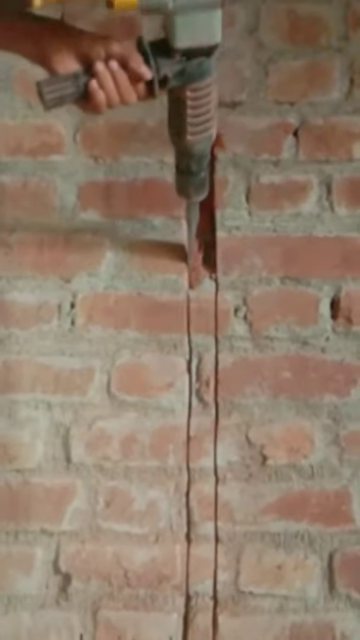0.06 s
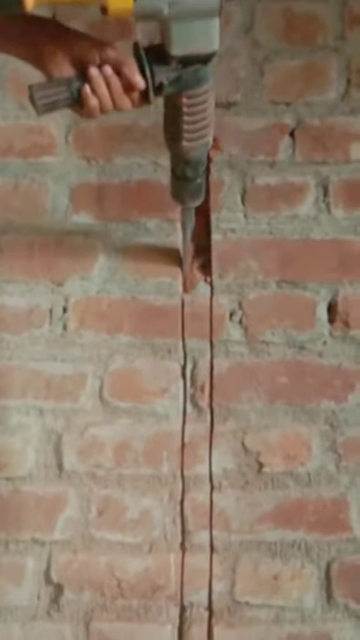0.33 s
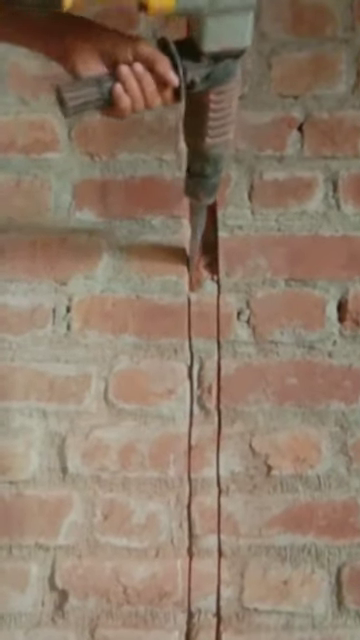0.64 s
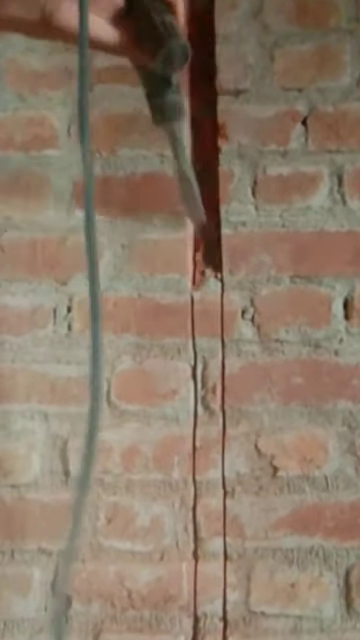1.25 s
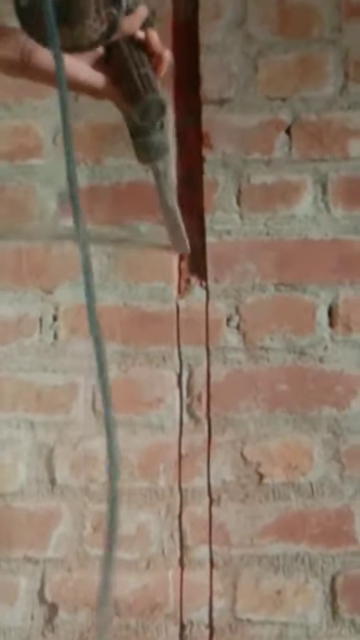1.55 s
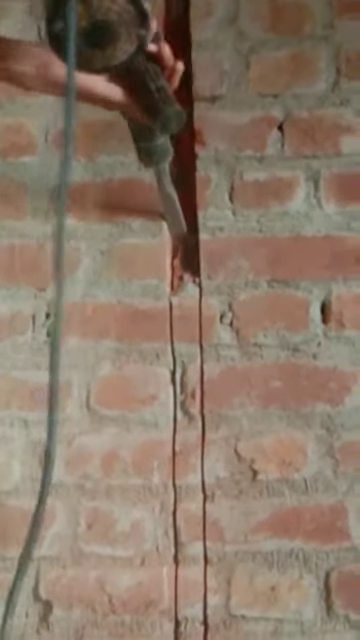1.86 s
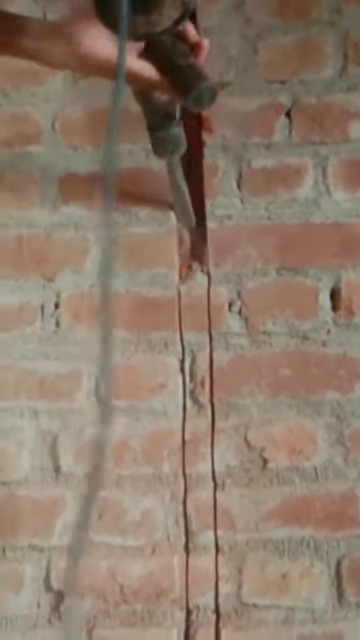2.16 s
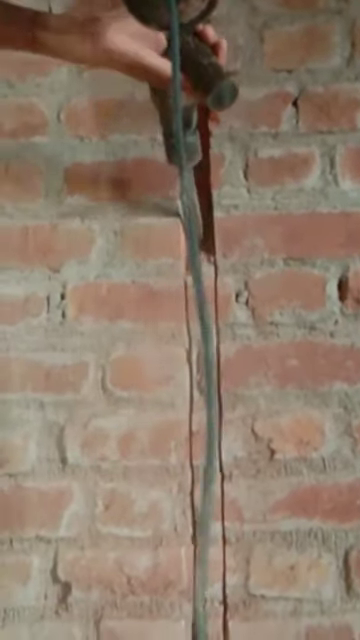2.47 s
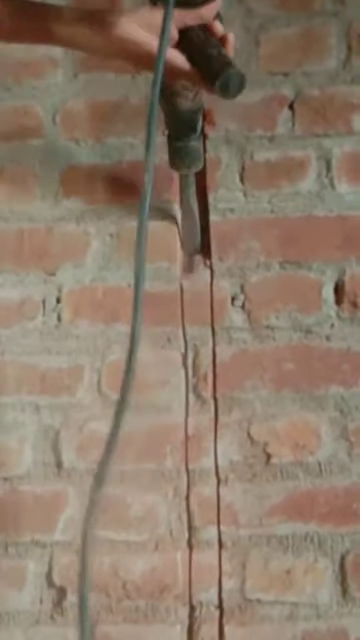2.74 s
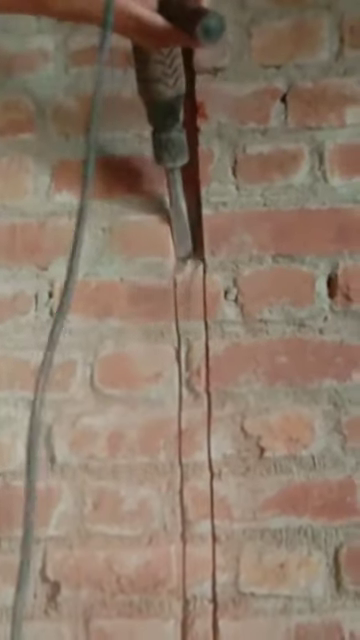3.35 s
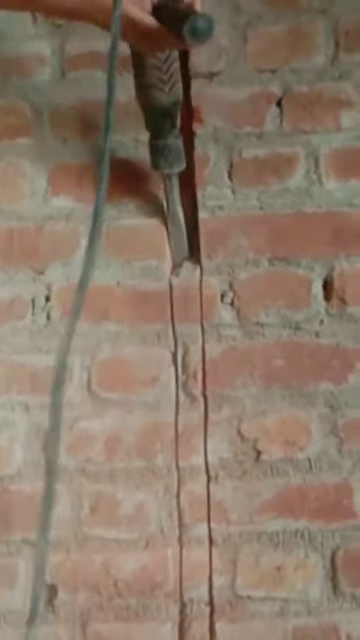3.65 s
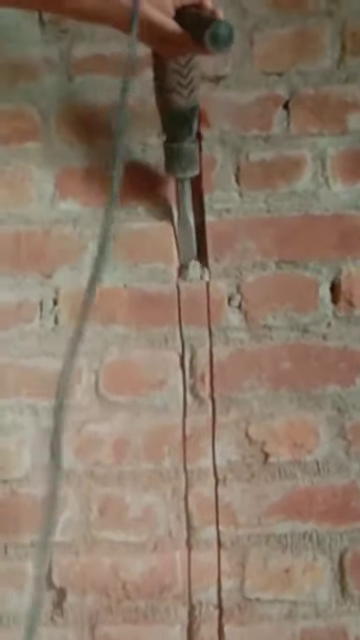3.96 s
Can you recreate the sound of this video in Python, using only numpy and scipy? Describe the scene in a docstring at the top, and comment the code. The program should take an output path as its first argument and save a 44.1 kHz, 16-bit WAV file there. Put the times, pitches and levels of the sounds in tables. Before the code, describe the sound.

An electric chipping hammer chisels a brick wall, winds down briefly, then hammers again.

```python
"""An electric chipping hammer cuts a channel in a brick wall, in a bare room.
At first about 53 blows a second crack the brick and ring the steel chisel, over the rush and whine
of the motor and a low hum. Before a second has passed the tool is lifted; it coasts down while the
chisel rattles loose in its holder. At two seconds it winds up and bites again, and the steel,
now wedged in the slot, sings thinly."""
import sys
import numpy as np
from scipy import signal
from scipy.fft import rfft, irfft
from scipy.io import wavfile
from scipy.ndimage import uniform_filter1d

SR = 44100
rng = np.random.default_rng(int(sys.argv[2]) if len(sys.argv) > 2 else 0)


def generate_wav(sig):
    """Save sig (samples, or channels by samples) to the path in sys.argv[1] as 16-bit PCM at SR."""
    pcm = np.round(np.clip(np.atleast_2d(sig).T, -1, 1) * 32767).astype(np.int16)
    wavfile.write(sys.argv[1], SR, pcm)


N = 176400

# Motor speed. Each row: time in seconds, piston strokes per second.
STROKE_RATE = [(0, 52), (.3, 55.3), (.48, 56), (.58, 52.4), (.65, 50), (.76, 51.1), (.87, 46.9),
               (1.14, 36.5), (1.46, 27.3), (1.7, 20.5), (2.0, 16), (2.09, 22.8), (2.135, 31.7), (2.2, 37.6),
               (2.35, 42.5), (2.5, 50.4), (2.65, 52.4), (2.8, 54), (3.15, 54), (3.35, 55), (3.65, 53),
               (4, 52.8)]
# Spells of hammering. Each row: start, end and the moment of one bite, all in seconds.
SPELLS = [(0, 1.0, .5605), (2.06, 4.02, 2.1206)]
# Force on the wall in each spell. Each row: time in seconds, relative level in dB.
FIRST_FORCE = [(0, -36), (.05, -28.5), (.27, -29.5), (.5, -29.5), (.66, -30), (.69, -38), (.78, -49.5)]
SECOND_FORCE = [(2.07, -28.5), (2.15, -27.5), (2.3, -25.5), (2.37, -28), (2.42, -41), (2.47, -31.5),
                (2.55, -26.5), (2.65, -31), (2.71, -36.5), (2.79, -32.5), (2.97, -27), (3.04, -29),
                (3.13, -36), (3.22, -35), (3.32, -31), (3.55, -29), (3.62, -33), (3.76, -31), (4, -31)]
# Spectra of cracking brick and shaken wall. Each row: frequency in Hz, relative density in dB.
BRICK_SPECTRUM = [(30, -34), (130, -8), (320, -8.5), (1000, -6.5), (1500, -1), (2300, 1), (3600, -1.5),
                  (4100, -3), (5300, -6.5), (6200, -13.5), (7300, -10), (8000, -23), (9600, -16),
                  (12500, -21), (14000, -20), (15500, -20)]
WALL_SPECTRUM = [(30, -28), (70, -32), (130, -4.5), (200, -2), (260, -1), (320, 5), (500, 1.5), (850, 0),
                 (1050, -5), (1500, -6), (2300, 6), (3000, -9), (3600, -0.5), (4100, -15), (5300, -5),
                 (6200, -25.5), (7300, -11.5), (8000, -27.5), (15500, -34)]
# High and bending modes of the chisel. Each row: frequency in Hz, bandwidth in Hz, weight in dB.
STEEL_MODES = [(3190, 230, 0), (3690, 120, 3.5), (5000, 53, -10), (6730, 75, -10), (9400, 250, -2.5),
               (10900, 100, -6), (11745, 96, -14.5), (15050, 300, -7)]
BENDING_MODES = [(1261, 31.5, 52), (1400, 43, -14), (1320, 70, -22), (1170, 70, -39), (2300, 73, -31),
                 (3950, 66, -28)]
# Drive of the bending modes. Each row: time in seconds, relative level in dB.
RING_LEVEL = [(0, -15.5), (.4, -14), (.56, -9.5), (.65, -12.5), (.71, -24.5), (.95, -18), (1.08, -12.5),
              (1.35, -18), (1.52, -16.5), (1.65, -27.5), (2.02, -23.5), (2.12, -10.5), (2.33, -13),
              (2.45, -15), (2.53, -17.5), (2.83, -11), (3.1, -17.5), (3.3, -15.5), (3.6, -19), (4, -16.5)]
# Spectrum of fan and gears. Each row: frequency in Hz, relative density in dB.
RUSH_SPECTRUM = [(30, -39), (90, -15.5), (200, -19), (400, -20.5), (600, -15), (770, -0.5), (900, -3),
                 (1020, -7.5), (1400, 6), (2000, -0.5), (2900, -2.5), (3700, -3.5), (4200, -13.5),
                 (5600, -10.5), (6200, -29.5), (7300, -33.5), (8100, -48), (10500, -40), (13500, -55.5),
                 (15500, -28.5)]
# Partials of armature whine and housing hum. Each row: multiple of the stroke rate, weight in dB.
WHINE_PARTIALS = [(35, -7), (70, 4), (105, -13)]
HOUSING_PARTIALS = [(1, -21), (2, 7), (3, 2), (4, -1), (6, -4)]
# Course of rush, whine, housing hum and mains hum. Each row: time in seconds, relative level in dB.
RUSH_LEVEL = [(0, -21.5), (.6, -28.5), (.8, -25), (1.1, -27), (1.45, -28.5), (1.65, -32.5), (1.85, -37),
              (2.02, -34), (2.15, -26), (2.4, -25), (2.7, -25.5), (3.15, -31.5), (3.5, -32), (4, -25.5)]
WHINE_LEVEL = [(0, -32), (.5, -33), (.76, -28), (.9, -36), (1.5, -37), (1.75, -43), (2.3, -43), (2.52, -30),
               (2.8, -32), (3.05, -36), (4, -37)]
HOUSING_LEVEL = [(0, -43), (.08, -40.5), (.38, -37.5), (.45, -44), (.57, -43), (.65, -32.5), (.74, -41),
                 (.85, -78), (2.05, -78), (2.3, -48), (2.43, -50), (2.6, -40), (3.08, -40), (3.2, -49),
                 (3.4, -40), (3.7, -42.5), (4, -39)]
MAINS_LEVEL = [(0, -64), (.88, -35.5), (1.04, -40), (1.1, -59), (1.9, -63), (2.0, -48), (4, -62)]
# Tinks of the dangling steel. Each row: start in seconds, relative level in dB.
TINKS = [(.933, -3), (1.0, 7), (1.08, -4), (1.151, 4.5), (1.183, -7), (1.295, -12), (1.333, -13), (1.4, -4),
         (1.94, -20)]
# Modes of the tinks. Each row: frequency in Hz, bandwidth in Hz, weight in dB.
TINK_MODES = [(5200, 330, 2), (7160, 100, -4), (9510, 120, -4.5), (10800, 50, 5), (14950, 120, -10)]
# A faint tone during coasting. Each row: time in seconds, frequency in Hz, level in dB.
SAGGING_TONE = [(1.1, 245.5, -80), (1.18, 245, -35), (1.25, 228.3, -50), (1.33, 231, -39), (1.42, 204, -52),
                (1.48, 202, -76.5)]
# Knocks of the chisel in its holder. Each row: start in seconds, relative level in dB.
KNOCKS = [(1.158, -5), (1.2, -6), (1.301, -5.5), (1.339, -1), (1.744, -6), (1.771, -6), (1.803, -1.5),
          (1.834, -12), (1.868, -6.5), (1.946, -2), (2.043, 1), (2.105, 2.5), (2.613, 1.5), (2.84, -27),
          (3.049, 6)]
# Bumps as the tool is shifted. Each row: start in seconds, relative level in dB.
BUMPS = [(1.405, -7), (1.976, 0.5)]
# Spectrum of a bump. Each row: frequency in Hz, relative density in dB.
BUMP_SPECTRUM = [(30, -25), (70, -16), (105, 9), (150, -2), (220, -4.5), (320, -16), (600, -30),
                 (2000, -63)]
# Modes of the wedged steel. Each row: frequency in Hz, bandwidth in Hz, weight in dB.
WEDGED_MODES = [(11745, 25, -6), (15030, 220, 0)]
# Drive of those modes. Each row: time in seconds, level in dB relative to the force on the wall.
WEDGED_LEVEL = [(2.07, 0), (2.38, 0), (2.5, -5), (3.0, -4), (4, -8)]

TIME = np.arange(N) / SR
BITE_LAG_STROKES, JITTER_S, SCATTER_DB = .36, .0003, 1.8
CRACK_S, CRUMBLE_S, CRUMBLE_DB = .0012, .013, -9
GRIT_PER_S, GRIT_S, GRIT_DB = 410, .00041, -13.5
BRICK_DB, WALL_DB, STEEL_DB = 4.5, 1.5, -4.5
STEEL_LOW_HZ, BENDING_TOP_HZ, MAINS_HUM_HZ, TOP_HZ = 1023, 4500, 101, 15700


def undb(db):
    """Amplitude grows tenfold with every 20 dB."""
    return 10 ** (np.asarray(db) / 20)


def unit(x):
    """Division by the rms gives a real signal unit power."""
    return x / np.sqrt(np.mean(x ** 2))


def curve(rows):
    """Linear interpolation joins rows of time in seconds and value."""
    return np.interp(TIME, *np.array(rows, float).T)


def noise():
    """Independent samples have a white spectrum."""
    return rng.standard_normal(N)


def wander(hz):
    """Averaging noise twice leaves a slow fluctuation of unit rms."""
    width = int(SR / hz)
    return unit(uniform_filter1d(uniform_filter1d(noise(), width), width))


def butterworth(x, hz, kind, order=4):
    """A maximally flat filter passes one side of its cutoff."""
    return signal.sosfilt(signal.butter(order, hz, kind, fs=SR, output="sos"), x)


def colour(x, spectrum):
    """A filter gives the sound the tone colour of the listed spectrum."""
    hz, db = np.array(spectrum, float).T
    bins_hz = np.maximum(np.arange(N + 1) * SR / (2 * N), 1)
    gain = undb(np.interp(np.log(bins_hz), np.log(hz), db))
    cepstrum = irfft(np.log(gain))
    cepstrum[1:N] *= 2  # fold the cepstrum onto positive time
    cepstrum[N + 1:] = 0
    return irfft(rfft(x, 2 * N) * unit(np.exp(rfft(cepstrum))))[:N]


def ring_steel(drive, modes):
    """Each mode responds as a damped sinusoid; a high-pass keeps the ringing out of the bass."""
    t = TIME[:SR // 4]
    response = sum(undb(db) * np.sqrt(width) * np.exp(-np.pi * width * t) * np.sin(2 * np.pi * hz * t)
                   for hz, width, db in modes)
    vibration = signal.fftconvolve(drive, response / np.linalg.norm(response))[:N]
    return butterworth(vibration, STEEL_LOW_HZ, "high")


def impulses(times, sizes):
    """A brief contact acts as a single impulse."""
    hits = np.zeros(N)
    np.add.at(hits, np.clip(times * SR, 0, N - 1).astype(int), sizes)
    return hits


def bursts(times, sizes, decay_s):
    """Incoherent hits add in energy, so their decaying envelope is the root of the sum."""
    retained = np.exp(-2 / (decay_s * SR))
    return np.sqrt(signal.lfilter([1], [1, -retained], impulses(times, sizes ** 2) + 1e-18))


def blows(strokes):
    """A stroke makes two impacts: a strike on the shank, then the tip's bite. Each has times and sizes."""
    bite_at = []
    for start, end, one_bite in SPELLS:
        count = np.floor(strokes - np.interp(one_bite, TIME, strokes))
        at = TIME[1:][np.diff(count) > 0]
        bite_at.extend(at[(at >= start) & (at < end)])
    strike_at = np.interp(np.interp(bite_at, TIME, strokes) - BITE_LAG_STROKES, strokes, TIME)
    chance = rng.standard_normal((400, 4))[:len(bite_at)].T
    strikes = strike_at + JITTER_S * chance[0], undb(SCATTER_DB * chance[1])
    bites = np.array(bite_at) + JITTER_S * chance[2], undb(SCATTER_DB * np.tanh(chance[3]))
    return strikes, bites


def fracture(times, sizes):
    """Brittle fracture has an envelope of sharp cracks, slower crumbling and random ticks of grit."""
    when, strength = rng.random((4000, 2))[:int(GRIT_PER_S * N / SR)].T
    grit_db = GRIT_DB - .5 * np.log(np.maximum(strength, .01))
    grit = bursts(when * N / SR, undb(grit_db), GRIT_S)
    crack = bursts(times, sizes, CRACK_S)
    crumble = undb(CRUMBLE_DB) * bursts(times, sizes, CRUMBLE_S)
    return unit(np.sqrt(crack ** 2 + crumble ** 2 + grit ** 2))


def chiselling(strikes, bites):
    """Impacts are broadband: each cracks the brick, shakes the wall and excites the steel's high modes."""
    times = np.r_[strikes[0], bites[0]]
    sizes = np.r_[undb(-.5) * strikes[1], bites[1]]
    cracks = fracture(times, sizes)
    thuds = unit(bursts(times, sizes, decay_s=.0075))
    sound = np.zeros(N)
    for rows in FIRST_FORCE, SECOND_FORCE:
        force = undb(curve(rows)) * (TIME >= rows[0][0]) * (TIME <= rows[-1][0])
        sound += undb(BRICK_DB) * colour(force * cracks * noise(), BRICK_SPECTRUM)
        sound += undb(WALL_DB) * colour(force * thuds * noise(), WALL_SPECTRUM)
        sound += undb(STEEL_DB) * ring_steel(force * cracks * noise(), STEEL_MODES)
    return sound + wedged_singing(cracks)


def chisel_ring(strikes):
    """The shank resonates in bending, driven by strikes, chatter in its holder and a few hard knocks."""
    pushes = unit(bursts(*strikes, decay_s=.0013) * noise())
    chatter = undb(2) * noise() * undb(1.7 * wander(hz=90))
    knock_at, knock_db = np.array(KNOCKS).T
    knocks = impulses(knock_at, undb(knock_db + 15))
    drive = undb(curve(RING_LEVEL) - 7) * (pushes + chatter) + knocks
    return butterworth(ring_steel(drive, BENDING_MODES), BENDING_TOP_HZ, "low")


def motor(strokes):
    """Rotation modulates the noise of fan and gears and sets the armature's whine; loose steel jingles."""
    flutter_db = 1.85 * wander(hz=160) + np.cos(2 * np.pi * strokes)
    rush = colour(noise() * undb(flutter_db), RUSH_SPECTRUM)
    whine = sum(undb(db + 2 * wander(hz=20)) * np.sin(2 * np.pi * k * strokes + .5 * wander(hz=60))
                for k, db in WHINE_PARTIALS)
    rattle = unit(noise() * undb(5 * wander(hz=40)))
    jingle = undb(-45) * ring_steel(rattle, STEEL_MODES)
    return undb(curve(RUSH_LEVEL) - 5) * (rush + jingle) + undb(curve(WHINE_LEVEL)) * whine


def hum(strokes):
    """Forced vibration: the piston shakes the housing, most at twice its rate; mains hums the windings."""
    housing = sum(undb(db + 3 * wander(hz=7.8)) * np.sin(2 * np.pi * k * strokes + .12 * wander(hz=13))
                  for k, db in HOUSING_PARTIALS)
    windings = np.sin(2 * np.pi * MAINS_HUM_HZ * TIME)
    return np.sqrt(2) * (undb(curve(HOUSING_LEVEL)) * housing + undb(curve(MAINS_LEVEL)) * windings)


def tinks():
    """Light contacts excite high modes of the dangling steel."""
    at, db = np.array(TINKS).T
    return ring_steel(bursts(at, undb(db - 47), decay_s=.02) * noise(), TINK_MODES)


def sagging_tone():
    """A faint tone and its second harmonic fall together in pitch while the tool coasts."""
    rows = np.array(SAGGING_TONE)
    hz, db = curve(rows[:, [0, 1]]), curve(rows[:, [0, 2]])
    phase = 2 * np.pi * np.cumsum(hz) / SR + .28 * wander(hz=40)
    return undb(db) * (np.sin(phase) + undb(-2) * np.sin(2 * phase))


def bumps():
    """Shifting the tool makes two bumps, dull because their energy lies in the bass."""
    at, db = np.array(BUMPS).T
    return colour(bursts(at, undb(db - 48), decay_s=.031) * noise(), BUMP_SPECTRUM)


def wedged_singing(cracks):
    """Wedged in the slot for the second spell, the steel resonates thinly in two very high modes."""
    force = undb(curve(SECOND_FORCE) + curve(WEDGED_LEVEL)) * (TIME >= SECOND_FORCE[0][0])
    return ring_steel(force * cracks * noise(), WEDGED_MODES)


def room(direct):
    """Reflections from bare brick merge into a diffuse tail that decays faster in the treble."""
    t, response = TIME[:SR], np.zeros(SR)
    for band, t60_s, db in ("low", .34, -5.5), ("high", .067, -18):
        tail = rng.standard_normal(SR) * np.exp(-np.log(1000) * t / t60_s) * (t > .003)
        response += undb(db) * butterworth(tail / np.linalg.norm(tail), 3500, band, order=2)
    return direct + signal.fftconvolve(direct, response)[:N]


def scene():
    """The sources superpose; one motor speed times the blows, the whine and the housing's hum."""
    strokes = np.cumsum(curve(STROKE_RATE)) / SR
    strikes, bites = blows(strokes)
    working = chiselling(strikes, bites) + chisel_ring(strikes) + motor(strokes)
    lifted = tinks() + sagging_tone() + bumps()
    return (room(working + lifted) + hum(strokes))[None]


def record(dry):
    """Soft saturation rounds the highest peaks, and a steep low-pass removes the top of the treble."""
    rounded = np.tanh(.71 * dry) / 1.104
    return signal.sosfilt(signal.ellip(10, .2, 80, TOP_HZ, fs=SR, output="sos"), rounded)


dry = scene()
out = record(dry)
generate_wav(out)
```